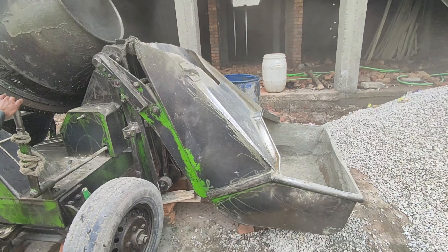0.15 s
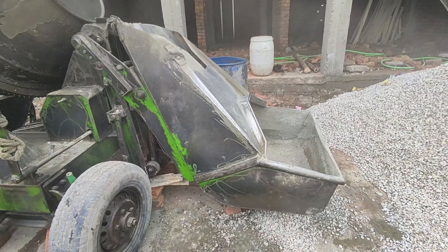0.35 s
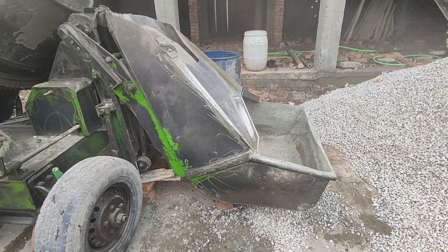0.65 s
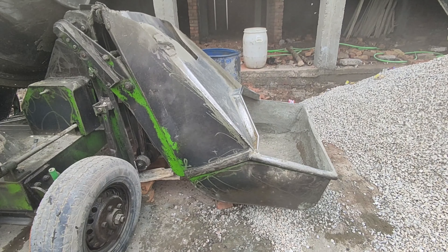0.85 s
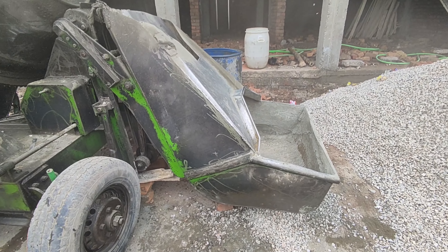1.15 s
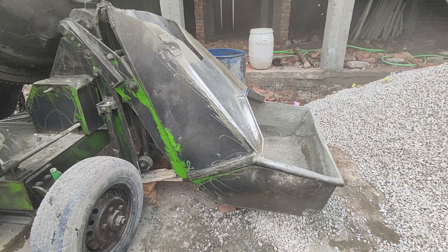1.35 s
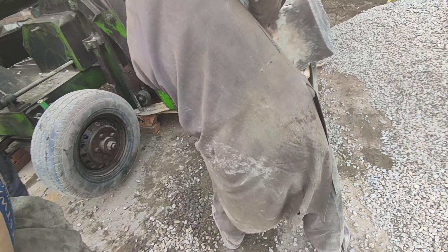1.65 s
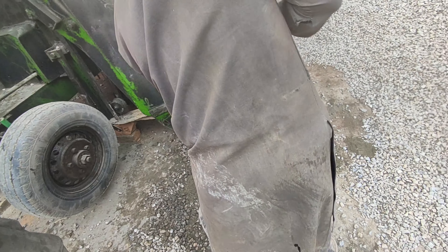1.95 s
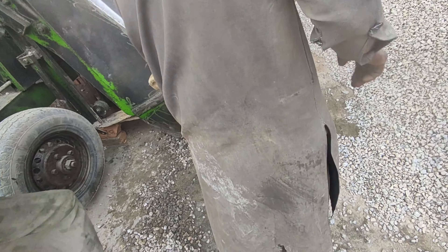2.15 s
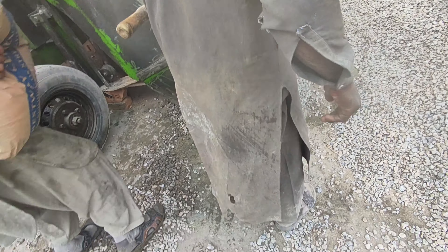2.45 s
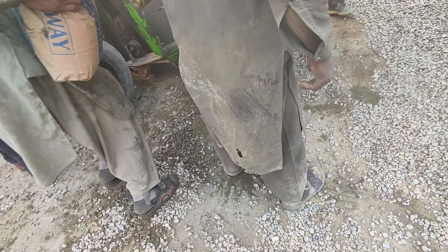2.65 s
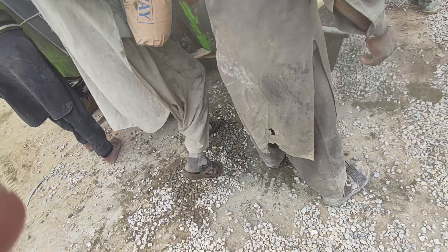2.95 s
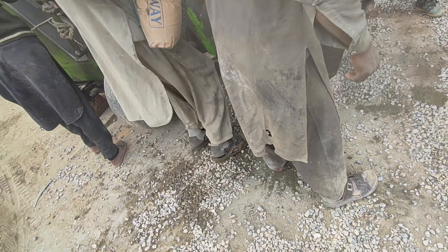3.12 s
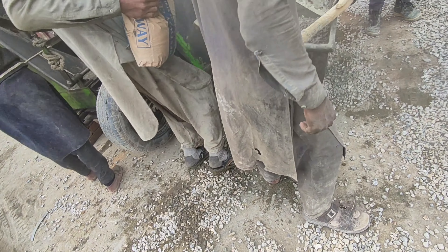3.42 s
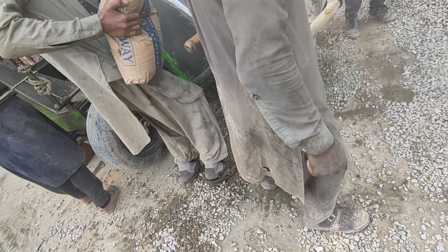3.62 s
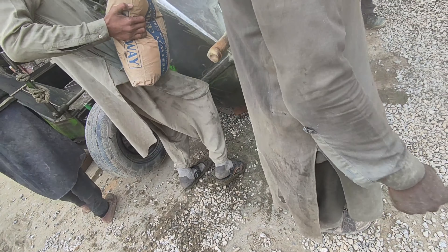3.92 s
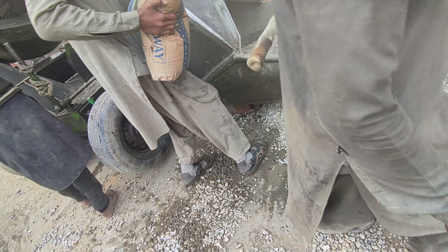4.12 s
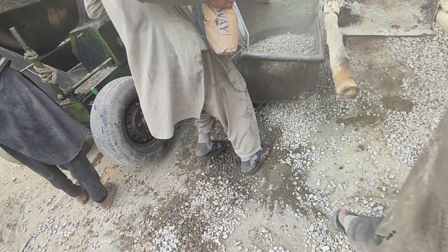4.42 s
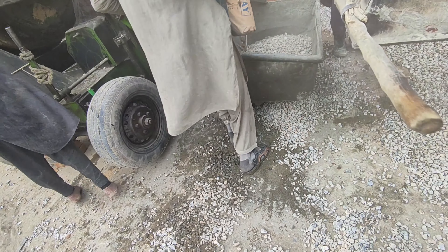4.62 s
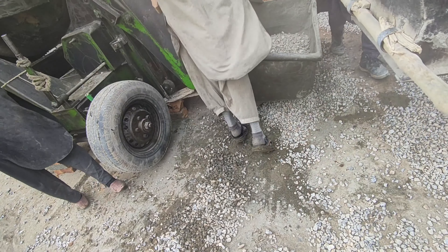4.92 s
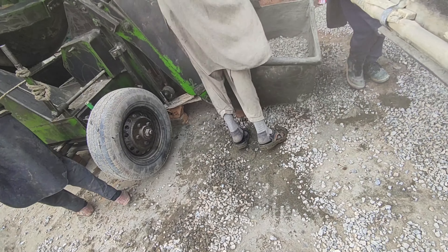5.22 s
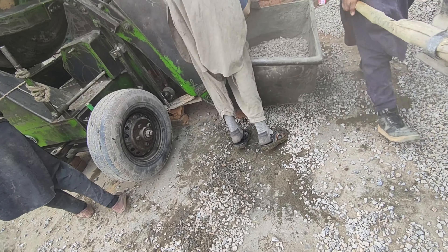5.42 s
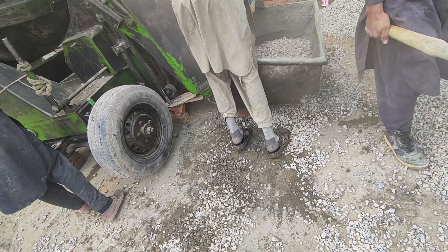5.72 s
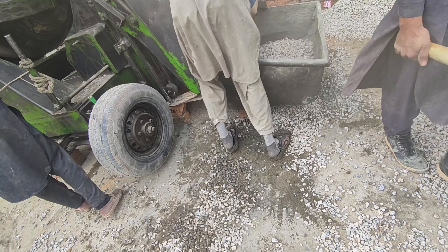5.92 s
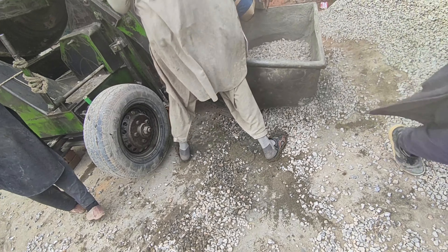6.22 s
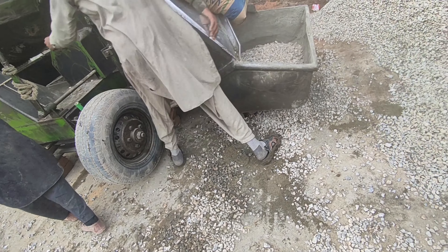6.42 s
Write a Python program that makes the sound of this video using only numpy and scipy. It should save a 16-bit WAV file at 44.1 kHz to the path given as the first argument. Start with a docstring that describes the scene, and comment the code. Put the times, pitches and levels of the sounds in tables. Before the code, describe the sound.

Outdoors and close, a single-cylinder diesel chugs about nine times a second, barking through its silencer, with metallic knocks and frame rattle. Gravel hisses and clatters in the mixer drum. The sound briefly cuts to silence, then stones slam booming into a steel hopper. The microphone turns towards the ground; hiss dulls, exhaust barks stronger, and faint footsteps crunch.

```python
"""Outdoor building site: a concrete mixer driven by a slow single-cylinder diesel, about nine firings a second.
Each firing thumps and barks through the silencer, rattles the frame and knocks in the iron block: shaped noise and
struck tones. Gravel hisses and knocks in the drum: random impacts through resonances.
The sound cuts out briefly; a shovelful of stones booms into the steel hopper, the microphone turns from the drum
to the ground, and feet crunch on the gravel."""
import sys
import numpy as np
from scipy import signal
from scipy.fft import rfft, irfft
from scipy.io import wavfile
from scipy.ndimage import uniform_filter1d

SR = 44100
rng = np.random.default_rng(int(sys.argv[2]) if len(sys.argv) > 2 else 0)


def log_audio(samples):
    """Write samples as a 16-bit WAV file to the path given in sys.argv[1]."""
    # one column per channel
    frames = np.atleast_2d(samples).T
    # limit to full scale, then quantise
    limited = np.clip(frames, -1, 1)
    pcm = np.round(limited * 32767).astype(np.int16)
    wavfile.write(sys.argv[1], SR, pcm)


N = 289737
TIME = np.arange(N) / SR
HZ = np.fft.rfftfreq(8192, 1 / SR)

# Conventions: pan_db is left over right. Pairs are (facing drum, facing ground).
# Engine timing, one firing at each whole cycle: time_s, cycles_done
CRANK = [(-.118, -1), (1.487, 13), (1.873, 17), (2.321, 21), (2.659, 24), (3.992, 36), (4.436, 40),
         (4.888, 44), (5.691, 51), (6.6, 59)]
# Gas puffs within a cycle: start_cycle_share, relative_db, rise_s, decay_s
EXHAUST_PUFFS = [(-.07, -1, .006, .025), (.19, -1, .006, .02), (.47, -6, .006, .02)]
# Valve-opening pulses: start_cycle_share, relative_db, rise_s, decay_s
BLOWDOWN = [(.06, 1.5, 0.0059, 0.017), (.36, -9.5, 0.0082, 0.0067)]
# Jolts of the frame: start_cycle_share, relative_db, rise_s, decay_s
FRAME_SHAKES = [(.02, -3, 0.0038, 0.02), (.17, -1.5, 0.0055, 0.0064), (.47, -14.5, 0.0032, 0.011)]
# Knocks in the block: start_cycle_share, relative_db, rise_s, decay_s
BLOCK_KNOCKS = [(-.01, -1.5, .005, .025), (.2, -6, .0016, .0076), (.45, -1.5, .005, .026)]
# Silencer and pipe resonances: centre_hz, width_hz, lift_db
PIPE_MODES = [(67.2, 11, 0.5), (109.5, 19.7, 15.5), (175.4, 11, 5.5), (296.4, 60, 7)]
# Iron block resonances: centre_hz, width_hz, lift_db
IRON_MODES = [(1132, 17, 6.5), (1406, 90, 0), (2130, 280, 2), (2420, 65, 2)]
# Colour of the valve-opening rumble: freq_hz, relative_db
RUMBLE_COLOUR = [(20, -19), (42, -21.5), (62, -8), (80, -5), (98, -0.5), (130, 10.5), (220, -25.5),
                 (1000, -81)]
# Colour of the exhaust boom: freq_hz, relative_db
EXHAUST_COLOUR = [(40, -38.5), (65, -25), (98, -14), (145, -4.5), (230, 0.5), (350, -3), (450, -4.5),
                  (560, -18.5), (900, -29.5), (2000, -89.5)]
# Colour of the frame: freq_hz, relative_db
FRAME_COLOUR = [(200, -35), (400, -1.5), (520, -3.5), (800, -2.5), (1050, -14.5), (1400, -8), (3000, -60)]
# Colour of the block: freq_hz, relative_db
BLOCK_COLOUR = [(500, -40), (900, -5.5), (1150, -5), (1600, -1.5), (2350, -6), (2800, -10), (3600, -21),
                (5000, -20), (8000, -47.5)]
# Pressure waves of one firing: delay_s, pitch_hz, relative_db, swell_s
BARKS = [(-.002, 325, 0, .008), (.015, 165, -1, .0065), (.024, 320, -6, .008), (.02, 296, -8, .028)]

# Colour of the gravel hiss: freq_hz, relative_db
GRAVEL_COLOUR = [(1500, -11), (2800, 2.5), (3700, 2), (5000, -4), (6800, -1.5), (7300, -11.5),
                 (10000, -23.5), (14500, -27.5)]
# Colour of fine grit: freq_hz, relative_db
FIZZ_COLOUR = [(4000, -24), (6800, -12.5), (8500, -1.5), (11400, 2), (11800, 8), (14400, 1.5)]
# Drum steel ring, before a fixed 7 dB cut: time_s, pitch_hz, ring_over_hiss_db
STEEL = [(.35, 3180, -1), (.48, 4030, -3.5), (1.5, 4220, -5), (1.85, 3230, -1.5)]
# Left lean of the grit: time_s, pan_db
GRIT_PAN = [(.74, 6.5), (.8, 6.5), (2.4, 18)]
# Drum wall resonances, struck by stones: pitch_hz, relative_db, decay_s
WALL_MODES = [(628, 2, 0.0071), (810, 2.5, 0.0074), (1157, -9.5, 0.0058), (1483, 0, 0.0099),
              (1858, -3, 0.028), (2180, 4, 0.0018), (2430, 0.5, 0.0079), (3196, -6, 0.0049)]
# Colour of the churning clatter: freq_hz, relative_db
CHURN_COLOUR = [(700, -27), (1600, 3), (2500, -9), (3500, -4), (4200, -31), (8000, -40)]
# Colour of the drum's growl: freq_hz, relative_db
GROWL_COLOUR = [(110, -10), (290, 0), (430, -2), (560, 0), (740, -2), (1000, -20), (2000, -45)]
# Hollow of the drum: centre_hz, width_hz, lift_db
DRUM_MODES = [(560, 70, 6)]

# Load landing in the hopper: start_s, level_db, rise_s, decay_s
DUMP = [(1.888, -1.5, .002, .035), (1.91, -10, .014, .04)]
# Hopper resonances: centre_hz, width_hz, lift_db
HOPPER_MODES = [(721, 52, 20.5), (1360, 110, 9)]
# Colour of the hopper: freq_hz, relative_db
HOPPER_COLOUR = [(35, -46), (80, -6), (170, -4.5), (240, 1.5), (350, 4), (480, -3.5), (750, -25.5),
                 (1300, -19), (3000, -65), (8000, -40)]
# Booms of the hopper floor: start_s, pitch_hz, level_db, swell_s
BOOMS = [(1.889, 345, -7, .012), (1.897, 185, -5, .018), (1.917, 315, -2, .028), (1.947, 182, -4, .028),
         (2.036, 195, -8.5, .018)]
# Loose steel parts: start_s, level_db, pitch_hz
CLANKS = [(0.455, -27, 2050), (0.803, -21.5, 2440), (1.371, -21, 2260), (1.486, -32, 2580),
          (1.836, -26, 2130), (2.267, -24.5, 2060), (2.322, -22.5, 2220), (2.59, -29, 2980),
          (2.882, -27, 2360), (3.345, -27, 2360), (6.147, -31, 2330)]
# Stones against a shovel: start_s, level_db, pitch_hz, pan_db
SCRAPES = [(1.31, -26, 5080, -7), (5.25, -31.5, 3960, -1)]
# Footsteps: start_s, level_db
STEPS = [(3.19, -41), (4.3, -38), (4.53, -42), (5.06, -36.5), (5.29, -34.5), (5.719, -40)]
# Single stones on steel: start_s, level_db, pitch_hz, pan_db
TICKS = [(0.207, -24, 4570, -14), (3.19, -40, 6000, 8), (4.3, -36, 10500, 9)]
# Strongest nearby reflection, shifting as the microphone moves: time_s, delay_ms, strength
REFLECTION = [(.7, 1.03, 0.35), (1.5, 1.03, 0.22), (2.6, 1.72, 0.098), (3.7, 1.8, 0.068), (4.45, 2.32, .18),
              (4.8, 0.93, 0.28), (6.5, 0.91, 0.46)]

TURN_S, TURN_TAKES_S = 2.277, .03  # microphone turns from drum to ground
EXHAUST_DB, RUMBLE_DB, BARK_DB = (-17.5, -16.4), (-29.5, -33), (-18.5, -12.4)
FRAME_DB, BLOCK_DB, STONES_DB = (-22, -22.5), (-23.5, -25), (-25, -31)
HISS_DB, GRIT_DB = (-29, -34.5), (-31.5, -41)
BLOCK_PAN_DB, HISS_PAN_DB = (4, -2), (-7.5, -1)

# Silencer tones at each firing
DEEP_HZ, DEEP_DB, THUMP_HZ, THUMP_DB, THUD_SWELL_S = 70, -28, 116, -25, .028
THUD_START_S, EXHAUST_STEEPNESS = -.009, 2.2  # start from firing; steepness of swell and fade
BARK_WAVER = .025  # random pitch share, standard deviation
STEADY = .8  # evening of energy between firings, 0-1
DEEP_LOSS_S, DEEP_LOSS_HALF_S, DEEP_LOSS_DB = 2.5, 1.7, 11  # deepest tone fades as the microphone moves
NEAR_S, NEAR_HALF_S = 3.7, 1.2  # microphone closest to the silencer
NEAR_DB, NEAR_THUMP_EXTRA_DB = .8, 4
LEFT_LEAD_MS = .36
SCREEN_S, SCREEN_HALF_S, SCREEN_DB = 2.068, .12, 8  # a worker screens the engine's clatter

STEEL_WIDTH_HZ = 850
SHADE_S, SHADE_HALF_S, SHADE_DB = 2.7, 1, 3  # workers in front of the drum shade its hiss
STONES_PER_S, STONE_SIZE_DB, STONE_LAG_S = 120, 2.2, .02  # mean lag after a jolt
CHURN_S, CHURN_HALF_S, CHURN_DB = 2.56, .17, -29  # louder once the worker is past
GROWL_S, GROWL_HALF_S, GROWL_DB = 2.7, .3, -18.8

HOPPER_STEEPNESS = 2.5
POUR_S, POUR_DECAY_S, POUR_HISS_DB, POUR_GRIT_DB = 1.83, .22, -27, -33
STRIKE_DB, STRIKE_HZ, STRIKE_DECAY_S = -13.5, 2450, .026
CLANK_WIDTH_HZ, CLANK_RISE_S, CLANK_DECAY_S = 110, .003, .037
RATTLE_HZ, RATTLE_DB = 2130, -5.5  # level relative to each clank
SCRAPE_RISE_S, SCRAPE_DECAY_S = .031, .044
STEP_RISE_S, STEP_DECAY_S, STEP_CRUNCH_DB = .015, .12, 5.5  # crunch over fizz
TICK_DECAY_S = .011

BREAK_START_S, BREAK_END_S = 1.522, 1.837
BREAK_FADE_S, BREAK_RETURN_S = .01, .003
EDGE_HZ = 14450


def exhaust():
    """The valve opens with a low thud and barks; puffs of gas then boom in the silencer and pipe."""
    pulse = strokes(BLOWDOWN, between_db=-13, repeat=.4, vary_db=.7)
    gas = strokes(EXHAUST_PUFFS, between_db=-6, repeat=.3, vary_db=.5)
    pipe = lifts(PIPE_MODES)
    rumble = ring(spread(pulse, side_db=-29), spectrum(RUMBLE_COLOUR) + pipe)
    rumble = panned(steadied(rumble), db=-1) * amp(turned(RUMBLE_DB))
    boom = ring(spread(gas, side_db=-16), spectrum(EXHAUST_COLOUR) + pipe)
    boom = panned(steadied(boom), db=1) * amp(turned(EXHAUST_DB))
    deep = every_firing(lambda age: thud(age, DEEP_HZ, DEEP_DB), vary_db=1)
    deep = deep * amp(-DEEP_LOSS_DB * passing(DEEP_LOSS_S, DEEP_LOSS_HALF_S))
    thump = every_firing(lambda age: thud(age, THUMP_HZ, THUMP_DB), vary_db=3.5) + rumble
    barks = every_firing(bark, vary_db=2.5) * amp(turned(BARK_DB))
    near = passing(NEAR_S, NEAR_HALF_S)
    return deep + (thump * amp(NEAR_THUMP_EXTRA_DB * near) + barks + boom) * amp(NEAR_DB * near)


def thud(age, hz, db):
    """A deep tone that one pressure pulse sets off in the silencer."""
    detune = 1 + .03 * rng.standard_normal()
    return amp(db) * tone(age - THUD_START_S, hz * detune, THUD_SWELL_S, EXHAUST_STEEPNESS)


def bark(age):
    """Pressure waves of one firing leave the pipe, nearly alike every time."""
    out = 0
    for start_s, hz, db, swell_s in BARKS:
        detune = 1 + BARK_WAVER * rng.standard_normal()
        out = out + amp(db) * tone(age - start_s, hz * detune, swell_s, EXHAUST_STEEPNESS)
    return out


def frame():
    """Guards and panels chatter as each firing shakes the frame."""
    shake = strokes(FRAME_SHAKES, between_db=-5, repeat=.25, vary_db=3)
    chatter = shake * impacts(per_s=510, decay_s=.019, size_db=2.5)
    panels = ring(spread(chatter, side_db=-8), spectrum(FRAME_COLOUR))
    return panned(panels, db=-1.4) * amp(turned(FRAME_DB))


def block():
    """Combustion and piston knocks ring the iron block, over the clatter of gears."""
    knocks = strokes(BLOCK_KNOCKS, between_db=-5, repeat=.4, vary_db=1)
    knocks = knocks * impacts(per_s=480, decay_s=.028, size_db=2)
    iron = ring(spread(knocks, side_db=0), spectrum(BLOCK_COLOUR) + lifts(IRON_MODES))
    return panned(iron, turned(BLOCK_PAN_DB)) * amp(turned(BLOCK_DB))


def drum():
    """Tumbling gravel rings the steel of the drum, with a fizz of fine grit on top."""
    grains = impacts(per_s=1000, decay_s=.023, size_db=2.5)
    hiss = ring(grains * rng.standard_normal((2, N)), spectrum(GRAVEL_COLOUR))
    pitch_hz = curve(STEEL)
    steel = resonate(resonate(hiss, pitch_hz, STEEL_WIDTH_HZ), pitch_hz, STEEL_WIDTH_HZ)
    # half the contrast cuts the hiss, half lifts the ring; the ring vanishes after the turn
    focus = amp(turned((curve(STEEL, axis=2), 0)) / 2)
    hiss = hiss / focus + turned((focus, 0)) * panned(steel, db=-19) * amp(-7)
    hiss = panned(hiss, turned(HISS_PAN_DB)) * amp(turned(HISS_DB))
    grit = ring(grains * rng.standard_normal((2, N)), spectrum(FIZZ_COLOUR))
    grit = panned(grit, curve(GRIT_PAN)) * amp(turned(GRIT_DB))
    return (hiss + grit) * amp(-SHADE_DB * passing(SHADE_S, SHADE_HALF_S))


def stones():
    """Crank turns jolt larger stones against the drum wall; each rings its modes in a different mix."""
    age, out = np.arange(SR // 20) / SR, np.zeros((2, N + 2 * SR))
    firings = firing_times()
    jolts = np.r_[firings, (firings[1:] + firings[:-1]) / 2]  # two turns per firing
    for jolt in rng.choice(jolts, round(STONES_PER_S * N / SR)):
        start = round((jolt + rng.exponential(STONE_LAG_S) + 1) * SR)
        size = amp(STONE_SIZE_DB * min(rng.exponential(), 2))
        for hz, db, decay_s in WALL_MODES:
            detuned_hz = hz * rng.uniform(.95, 1.05)
            mode = np.exp(-age / decay_s) * np.sin(2 * np.pi * detuned_hz * age)
            out[:, start:start + len(age)] += size * amp(db) * rng.uniform(-.94, 1, (2, 1)) * mode
    return evened(out[:, SR:SR + N]) * amp(turned(STONES_DB))


def churn():
    """A swell of clattering stones in the drum, over its hollow growl."""
    rolling = impacts(per_s=160, decay_s=.02, size_db=2) * spread(rng.standard_normal((2, N)), side_db=-14)
    growl = from_left(ring(rolling, spectrum(GROWL_COLOUR) + lifts(DRUM_MODES)))
    clatter = gravel(CHURN_COLOUR) * amp(CHURN_DB) * passing(CHURN_S, CHURN_HALF_S)
    return clatter + growl * amp(GROWL_DB) * passing(GROWL_S, GROWL_HALF_S)


def hopper():
    """A load of stones drums on the steel floor of the hopper, which booms and rings on."""
    force = sum(amp(db) * blow(TIME - s, rise_s, decay_s) for s, db, rise_s, decay_s in DUMP)
    patter = force * spread(rng.standard_normal((2, N)), side_db=-17)
    steel = ring(patter, spectrum(HOPPER_COLOUR) + lifts(HOPPER_MODES))
    boom = sum(amp(db) * tone(TIME - s, hz, swell_s, HOPPER_STEEPNESS) for s, hz, db, swell_s in BOOMS)
    return boom + steel * np.sqrt(np.mean(force ** 2))


def pour():
    """The load hisses off the shovel, and its first stones crack against the hopper."""
    hiss = amp(POUR_HISS_DB) * panned(gravel(GRAVEL_COLOUR), db=-2)
    grit = amp(POUR_GRIT_DB) * panned(gravel(FIZZ_COLOUR), db=-4)
    slide = (hiss + grit) * blow(TIME - POUR_S, .0061, POUR_DECAY_S)
    strike = crunch(STRIKE_HZ) * blow(TIME - DUMP[0][0], .0051, STRIKE_DECAY_S)
    return slide + amp(STRIKE_DB) * strike


def clanks():
    """Loose steel parts knock together now and then: a short ring over a rattle."""
    rattle, out = amp(RATTLE_DB) * crunch(RATTLE_HZ), np.zeros((2, N))
    age = np.arange(SR // 5) / SR
    for start_s, db, hz in CLANKS:
        start = round(start_s * SR)
        span = slice(start, start + len(age))
        noise = rng.standard_normal((2, len(age)))
        steel = evened(resonate(noise, np.full(len(age), hz), CLANK_WIDTH_HZ))
        out[:, span] += amp(db) * blow(age, CLANK_RISE_S, CLANK_DECAY_S) * (steel + rattle[:, span])
    return out


def steps():
    """Each foot presses the gravel, which crunches and settles."""
    power = sum((amp(db) * blow(TIME - s, STEP_RISE_S, STEP_DECAY_S)) ** 2 for s, db in STEPS)
    fizz = panned(gravel(FIZZ_COLOUR), db=27)
    return np.sqrt(power) * (fizz + amp(STEP_CRUNCH_DB) * gravel(GRAVEL_COLOUR))


def scrapes():
    """Short slides of stones against a shovel, near by."""
    return grain_bursts(SCRAPES, SCRAPE_RISE_S, SCRAPE_DECAY_S)


def ticks():
    """Single stones drop on steel."""
    return grain_bursts(TICKS, .001, TICK_DECAY_S)


def grain_bursts(rows, rise_s, decay_s):
    """Short bursts of dense grains, each with its own pitch and direction."""
    out = 0
    for start_s, db, hz, pan_db in rows:
        out = out + amp(db) * blow(TIME - start_s, rise_s, decay_s) * panned(crunch(hz), pan_db)
    return out


def gravel(colour):
    """Countless small collisions of stones, in the given colour."""
    return ring(impacts(per_s=900, decay_s=.011, size_db=4) * rng.standard_normal((2, N)), spectrum(colour))


def crunch(hz):
    """Dense grains of stone or steel whose energy gathers around hz."""
    grains = impacts(per_s=1700, decay_s=.0071, size_db=2.5) * rng.standard_normal((2, N))
    octaves = np.log2((HZ + 1) / hz)
    return ring(grains, -14 * np.log1p(octaves ** 2 * 1.3))


def impacts(per_s, decay_s, size_db):
    """Loudness of many small random impacts, each a sharp start and a short ring."""
    sizes = amp(size_db * np.minimum(rng.exponential(1, N), 4))
    hits = (rng.random(N) < per_s / SR) * sizes
    power = signal.lfilter([1], [1, -np.exp(-2 / (decay_s * SR))], hits ** 2)
    return evened(np.sqrt(power))


def firing_times():
    """The moment of every firing (s)."""
    time_s, cycles = np.transpose(CRANK)
    return np.interp(np.arange(cycles[0], cycles[-1]), cycles, time_s)


def firing_window():
    """Time around one firing (s), and the start sample of each window in a track padded by 1 s."""
    age = np.arange(-SR // 50, SR // 5) / SR
    return age, np.round((firing_times() + age[0] + 1) * SR).astype(int)


def every_firing(sound, vary_db):
    """Plays sound(age) once at each firing, a little stronger or weaker each time."""
    age, starts = firing_window()
    out = np.zeros(N + 2 * SR)
    for start in starts:
        out[start:start + len(age)] += amp(vary_db * rng.standard_normal()) * sound(age)
    return out[SR:SR + N]


def strokes(blows, between_db, repeat, vary_db):
    """Force of the blows in every cycle: one part repeats at each firing, the rest is turbulent."""
    age, starts = firing_window()
    period_s = np.diff(firing_times()).mean()
    power = 0
    for share, db, rise_s, decay_s in blows:
        power = power + (amp(db) * blow(age - share * period_s, rise_s, decay_s)) ** 2
    shape = np.sqrt(power)
    # the same paths through the machine scatter each blow alike, keeping all its frequencies
    paths = rfft(shape * rng.standard_normal((2, len(age))))
    pattern = irfft(paths / abs(paths), len(age)) * np.linalg.norm(shape)
    repeat = np.clip(repeat, 0, 1)
    force = amp(between_db) * rng.standard_normal((2, N + 2 * SR))
    for start in starts:
        turbulent = shape * rng.standard_normal(pattern.shape)
        stroke = np.sqrt(repeat) * pattern + np.sqrt(1 - repeat) * turbulent
        force[:, start:start + len(age)] += amp(vary_db * rng.standard_normal()) * stroke
    return force[:, SR:SR + N]


def steadied(x):
    """Every firing releases the same charge of gas, so the energy over one cycle hardly varies."""
    period = round(np.diff(firing_times()).mean() * SR)
    power = uniform_filter1d(x.mean(0) ** 2, size=period)
    return evened(x / (abs(power) + 1e-9) ** (STEADY / 2))


def blow(age, rise_s, decay_s):
    """A swell of height 1 that dies away."""
    return np.clip(age / rise_s, 0, 1) * np.exp(-np.maximum(age - rise_s, 0) / decay_s)


def tone(age, hz, swell_s, steepness):
    """A struck cavity or plate: one pitch under an envelope that swells to 1 and fades."""
    u = np.maximum(age, 0) / swell_s
    return (u * np.exp(1 - u)) ** steepness * np.sin(2 * np.pi * hz * age)


def ring(x, db):
    """Passes x through a causal body with the given response, so that blows start sharply and ring on."""
    log_gain = np.log(amp(np.r_[db, db[-2:0:-1]]))
    response = np.exp(np.conj(signal.hilbert(log_gain)))  # minimum phase
    taps = np.fft.ifft(response).real[:len(HZ)]
    return evened(signal.oaconvolve(x, taps[None], axes=1)[:, :N])


def resonate(x, hz, width_hz):
    """A resonance of gain 1 that follows the curve hz."""
    turn = np.exp(2j * np.pi * np.cumsum(hz) / SR)
    r = np.exp(-np.pi * width_hz / SR)
    return 2 * (turn * signal.lfilter([1 - r], [1, -r], x / turn)).real


def lifts(modes):
    """The dB that a set of resonances adds at each frequency."""
    return sum(db / (1 + (2 * (HZ - hz) / width_hz) ** 2) for hz, width_hz, db in modes)


def spectrum(points):
    """Joins (freq_hz, db) points on a log-frequency axis."""
    hz, db = np.transpose(points)
    return np.interp(np.log(HZ + 1), np.log(hz), db)


def reflected(x):
    """A dull, slightly late copy joins the direct sound and colours it like a slowly shifting comb."""
    dull = signal.sosfiltfilt(signal.butter(1, 1700, fs=SR, output="sos"), x)
    late = TIME - curve(REFLECTION) / 1000
    echo = np.array([np.interp(late, TIME, side) for side in dull])
    return x + curve(REFLECTION, axis=2) * echo


def from_left(x):
    """Sound from the left reaches the right side a little later."""
    return np.array([x[0], np.interp(TIME - LEFT_LEAD_MS / 1000, TIME, x[1])])


def spread(x, side_db):
    """Two unrelated signals become a centre and a width."""
    side = amp(side_db) * x[1]
    return np.array([x[0] + side, x[0] - side])


def panned(x, db):
    """Leans a pair to the left by db."""
    return evened(x * amp(np.array([db, -db]).reshape(2, -1) / 2))


def turned(levels):
    """Blends a value from facing the drum to facing the ground as the microphone turns."""
    before, after = levels
    return before + (after - before) * (1 + np.tanh((TIME - TURN_S) / TURN_TAKES_S)) / 2


def passing(centre_s, half_s):
    """A smooth rise to 1 and fall, as something goes by."""
    return np.exp(-((TIME - centre_s) / half_s) ** 2)


def curve(rows, axis=1):
    """One column of a timed table, at every sample."""
    rows = np.array(rows)
    return np.interp(TIME, rows[:, 0], rows[:, axis])


def amp(db):
    """Decibels to gain."""
    return 10 ** (np.asarray(db) / 20)


def evened(x):
    """Scales a sound so that the mean of its channels has rms 1."""
    return x / np.sqrt(np.mean(np.atleast_2d(x).mean(0) ** 2) + 1e-20)


def scene():
    """The engine, the gravel and the work around the mixer."""
    screen = amp(-SCREEN_DB * passing(SCREEN_S, SCREEN_HALF_S))
    machine = exhaust() + screen * (reflected(from_left(frame() + block())) + stones())
    return machine + drum() + churn() + hopper() + pour() + clanks() + steps() + scrapes() + ticks()


def record(dry):
    """Soft overload on the loudest peaks, the silent break, and the band limit."""
    ceiling = .84
    limited = dry / (1 + (dry / ceiling) ** 6) ** (1 / 6)
    before = np.clip((BREAK_START_S - TIME) / BREAK_FADE_S + .5, 0, 1)
    after = np.clip((TIME - BREAK_END_S) / BREAK_RETURN_S + .5, 0, 1)
    lowpass = signal.firwin(511, EDGE_HZ, window=("kaiser", 9), fs=SR)
    return signal.oaconvolve(limited * (before + after), lowpass[None], "same")


dry = scene()
out = record(dry)
log_audio(out)
```